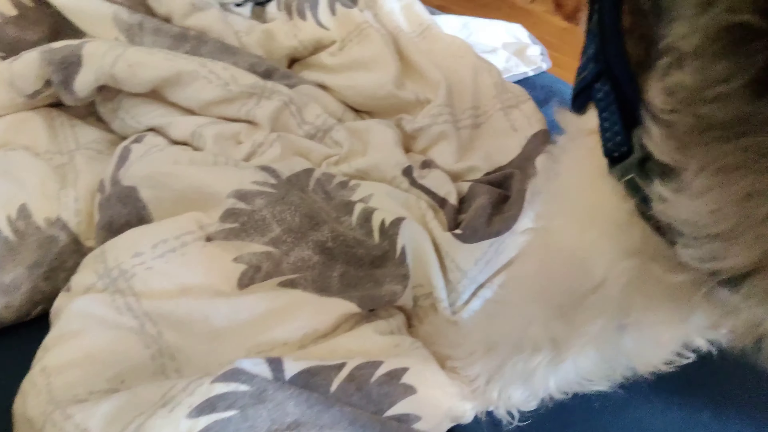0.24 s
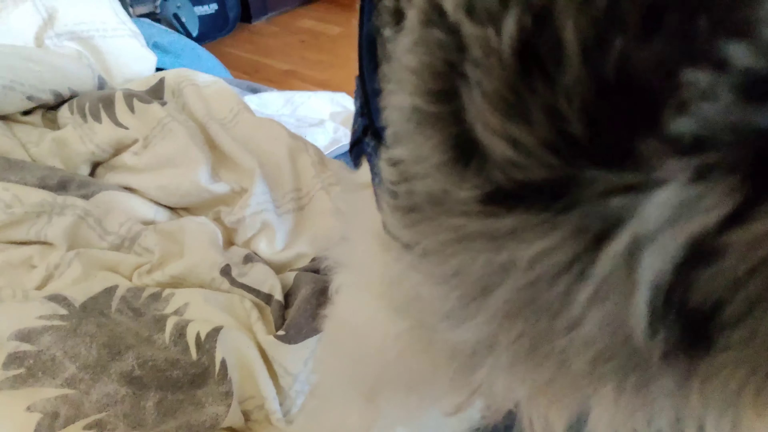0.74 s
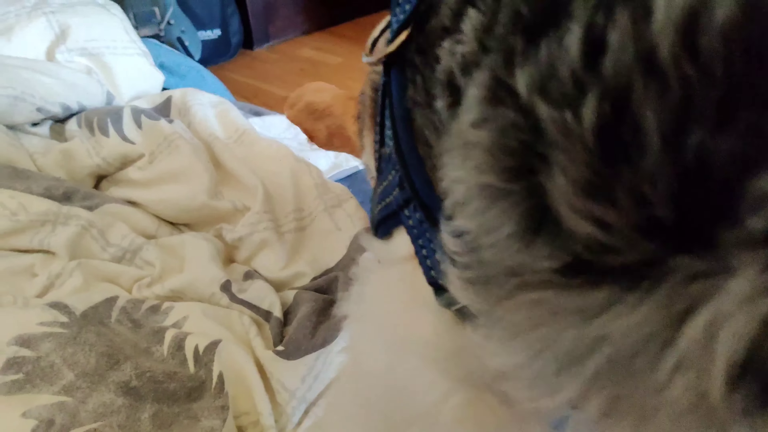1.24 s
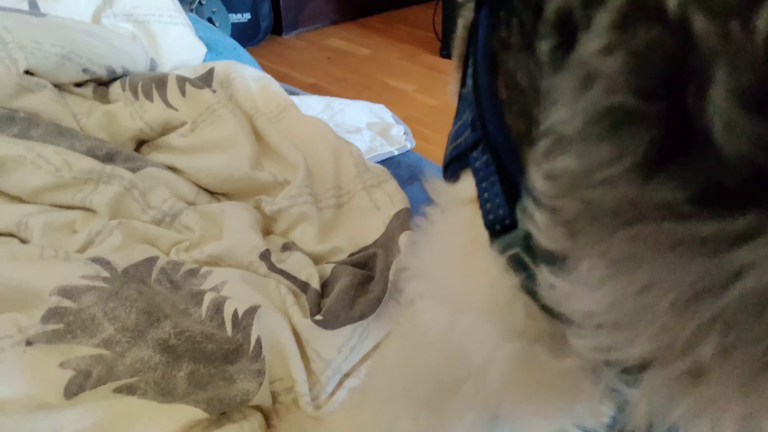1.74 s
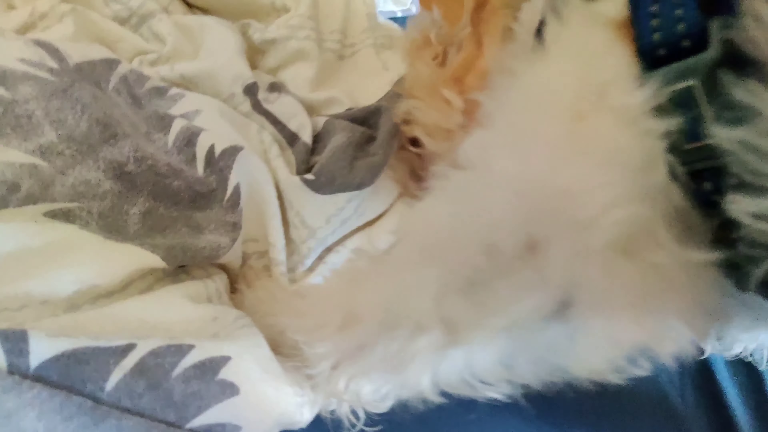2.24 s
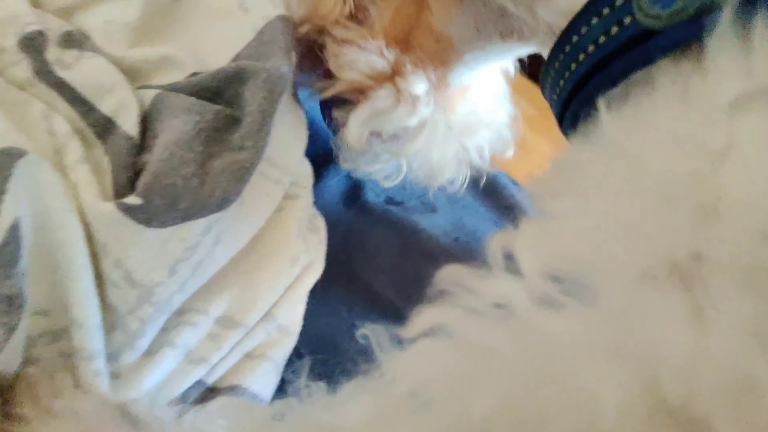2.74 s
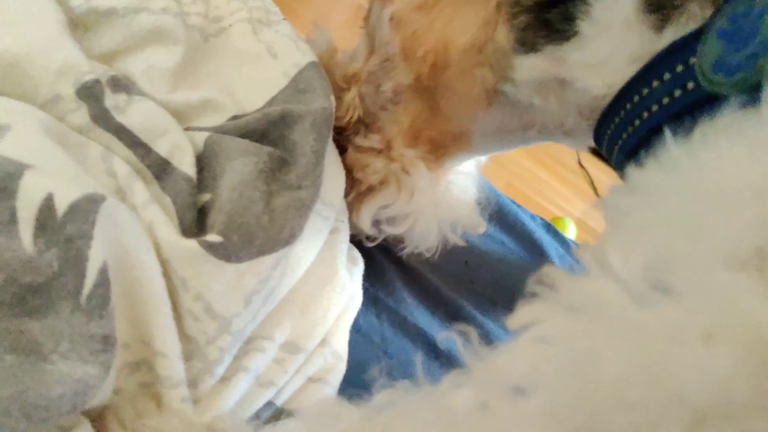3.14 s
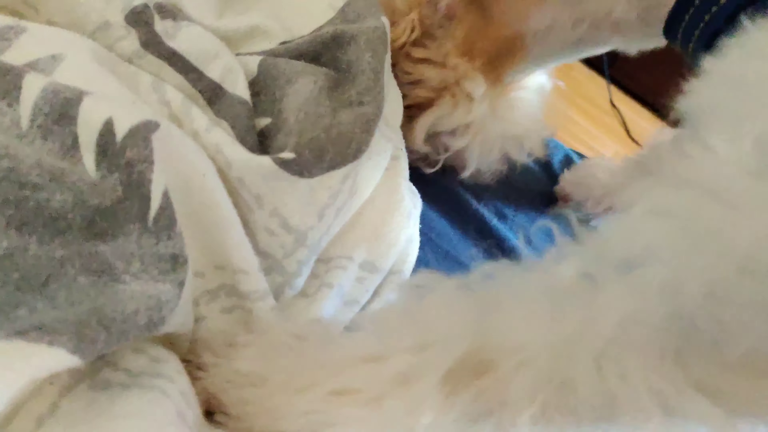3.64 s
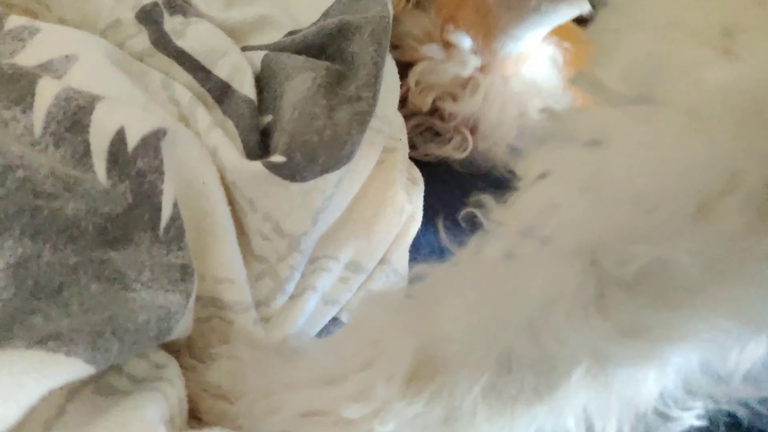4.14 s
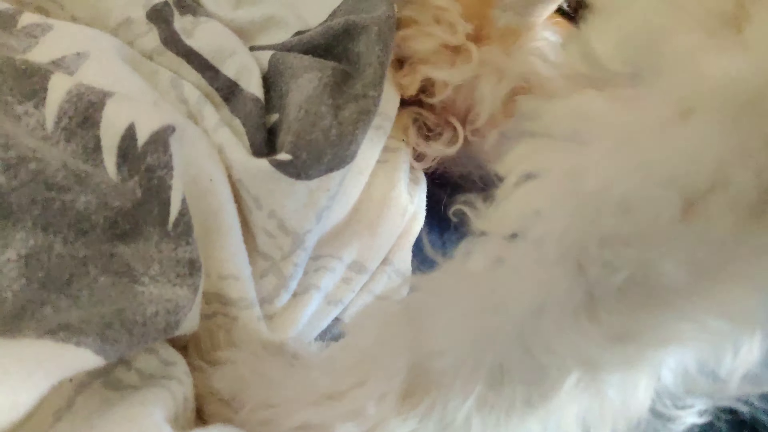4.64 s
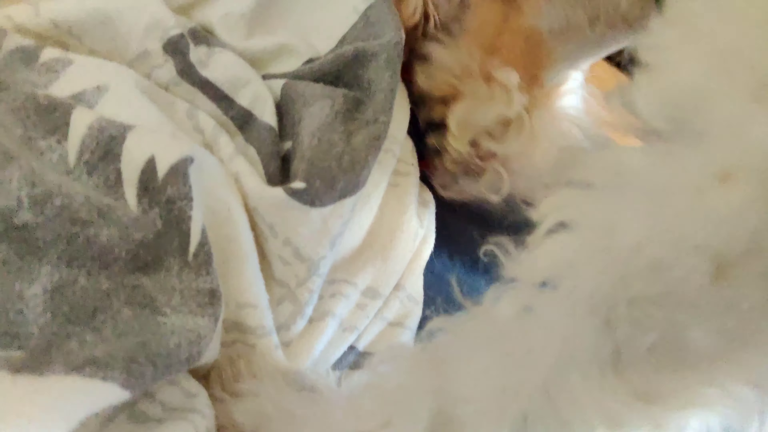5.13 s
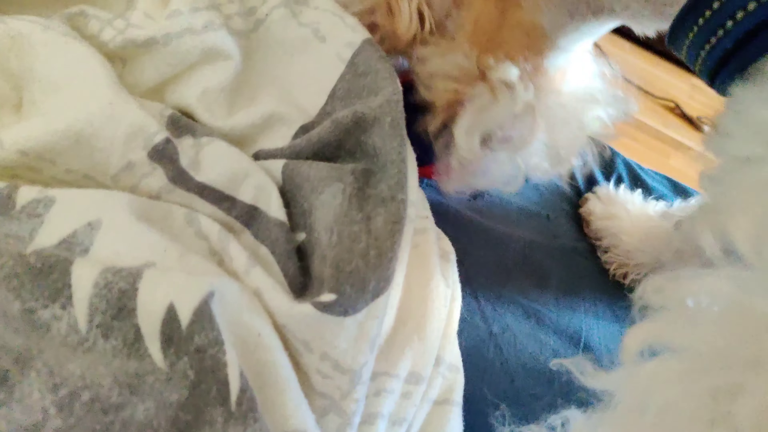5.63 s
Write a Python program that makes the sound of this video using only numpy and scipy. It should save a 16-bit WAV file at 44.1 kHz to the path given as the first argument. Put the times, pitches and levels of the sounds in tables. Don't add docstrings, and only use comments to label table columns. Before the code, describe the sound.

A rubber squeaker shrieks under a dog's bites, each squeal swooping up and falling, some breaking into low raspy notes, with thin whistles as air returns. Bedding heaves and rustles underneath, with dull paw thumps. The squeals pause after four seconds for faint ticks, then return twice at the end. Near handheld microphone, hard-walled small room, light hiss.

```python
import sys
import numpy as np
from scipy import signal
from scipy.fft import rfft, irfft
from scipy.io import wavfile
from scipy.ndimage import uniform_filter1d, minimum_filter1d

SR = 44100
rng = np.random.default_rng(int(sys.argv[2]) if len(sys.argv) > 2 else 0)


def pcm_store(signal):
    levels = np.round(np.clip(np.atleast_2d(signal), -1, 1) * 32767)
    wavfile.write(sys.argv[1], SR, levels.astype(np.int16).T)


def gain_from_decibels(decibels):
    exponent = np.asarray(decibels, float) / 20
    return 10 ** exponent


N = 259308
LEAD = SR // 4

# [f/Hz, level/dB per Hz]
HISS_SPECTRUM = [(120, -30), (200, -5.5), (538, -10.5), (986, -16), (1370, -22), (7830, -24), (9230, -23),
                 (16000, -30)]
# [f/Hz, level/dB]
PORT_DIFFERENCE = [(100, -3.5), (2000, 3), (5000, -1.5), (7000, 4.5), (9000, 15), (12000, 6), (16000, 9.5)]
# [f/Hz, level/dB per Hz]
HEAVE_SPECTRUM = [(12, -16.5), (25, -1), (45, -3), (80, -10.5), (180, -14.5), (300, -43.5), (500, -100)]
# [t/s, rumble level/dB, rustle level/dB]
WEIGHT_SHIFTS = [(0.0, -54, -68), (0.309, -46, -73), (.47, -56, -60), (0.598, -57.5, -63.5),
                 (0.832, -45, -57.5), (1.002, -54, -87), (1.391, -40, -59), (1.56, -52, -49),
                 (1.69, -53, -60), (1.85, -56.5, -68), (2.13, -38, -58), (2.36, -49, -56.5),
                 (2.5, -42, -60.5), (2.63, -58, -57), (2.78, -49.5, -47.5), (2.989, -49.5, -70),
                 (3.13, -46, -76), (3.239, -49.5, -61), (3.491, -61, -54.5), (3.669, -37.5, -53.5),
                 (3.95, -55, -52.5), (4.11, -43, -54), (4.28, -32, -82), (4.88, -48, -93), (5.1, -66, -72),
                 (5.31, -49.5, -90), (5.44, -43.5, -66.5), (5.679, -43, -50)]
# [t/s, peak level/dB]
QUILT_THUMPS = [(.095, -43), (.223, -44.5), (.27, -36), (.835, -35.5), (1.289, -53), (1.318, -30),
                (1.365, -36.5), (1.634, -36.5), (1.857, -30.5), (2.049, -33), (2.114, -24), (2.143, -53),
                (2.407, -29.5), (2.474, -34), (2.753, -34), (3.014, -43.5), (3.106, -33), (3.445, -26.5),
                (3.662, -56.5), (4.093, -36), (4.243, -32.5), (4.271, -31.5), (4.538, -53), (4.888, -48),
                (5.271, -44), (5.325, -43), (5.371, -43), (5.395, -48.5), (5.423, -37)]
# [t/s, peak level/dB, ring f/Hz]
TEETH_TICKS = [(.183, -45.5, 8470), (1.2698, -48.5, 5820), (4.6144, -61, 5460), (4.7214, -46.5, 5450),
               (4.7272, -40.5, 5400), (4.7765, -49, 5800), (4.7951, -52, 2240), (4.8414, -61, 5950),
               (5.0818, -40.5, 2450), (5.3291, -53, 5230)]
# [delay t/s, left level/dB, right level/dB]
FIRST_ECHOES = [
    (.0003, -20, -29.5),
    (.0008, -31.5, -16.5),
    (.0021, -31.5, -12.5),
    (.0047, -17, -23.5),
    (.0093, -37, -10.5),
]
# [f/Hz, level/dB]
SHELL_COLOUR = [(900, -13), (1400, -13.5), (2600, -2.5), (3750, -8), (5600, 2.5), (7200, -13), (9400, -5.5),
                (11000, -15.5), (15000, -16.5), (16200, -36.5)]
# [pitch f/Hz, level/dB]
OVERTONE_LEVELS = [(1200, -14.5), (2000, -8), (3000, -12.5), (4000, -14.5), (5000, -22.5), (6200, -34),
                   (7000, -28.5), (7900, -21.5)]
# [t/s, pitch f/Hz, fundamental level/dB]
OPENING_BITES = [
    [(-.2, 2500, -20), (-.12, 3974, -24), (-.06, 3983, -36), (-.02, 1410, -35)],
    [(.388, 2900, -29.5), (.406, 3750, -21.5), (.425, 4955, -7.5), (.479, 6204, -7.5), (.488, 5909, -8.5),
     (.516, 3820, -20), (.531, 2090, -36), (.54, 1411, -29), (.546, 1337, -41)],
    [(.59, 1418, -27), (.6, 2933, -25), (.608, 2930, -32)],
    [(.818, 2900, -30), (.826, 4598, -15.5), (.834, 5080, -6.5), (.852, 4260, -13.5), (.871, 2830, -24),
     (.897, 1332, -28.5), (.905, 1258, -36)],
    [(1.402, 2623, -29), (1.438, 3130, -18.5), (1.455, 3204, -12.5), (1.466, 3630, -19), (1.484, 4098, -24),
     (1.507, 3450, -22), (1.527, 3029, -22), (1.57, 2952, -32.5)],
    [(1.582, 1468, -24.5), (1.592, 2990, -18.5), (1.604, 3644, -19.5), (1.617, 3900, -28.5),
     (1.636, 3587, -16), (1.679, 5200, -9), (1.696, 4430, -14), (1.73, 1950, -30), (1.75, 1292, -31.5)],
]
# [t/s, pitch f/Hz, fundamental level/dB]
MIDDLE_BITES = [
    [(2.269, 1330, -25.5), (2.282, 1558, -21.5), (2.302, 1500, -26.5), (2.335, 1260, -33)],
    [(2.526, 2700, -21.5), (2.538, 2945, -21), (2.542, 1923, -25.5), (2.552, 3237, -25), (2.566, 3825, -18),
     (2.585, 6030, -9), (2.605, 6960, -19.5), (2.63, 5230, -11.5), (2.68, 1373, -36.5)],
    [(2.758, 1215, -32.5), (2.767, 1557, -22), (2.825, 1280, -24.5), (2.845, 1289, -34)],
    [(2.85, 2790, -35.5), (2.887, 2568, -32.5), (2.905, 2850, -34.5), (2.92, 2167, -28),
     (2.93, 2540, -42.5)],
    [(3.228, 1739, -32.5), (3.242, 1853, -30), (3.252, 1766, -31), (3.27, 1958, -31), (3.291, 3200, -26.5),
     (3.304, 3194, -19.5), (3.334, 3300, -23.5), (3.35, 1565, -35), (3.365, 1338, -43.5)],
    [(3.446, 1600, -28), (3.458, 1900, -23), (3.48, 2305, -19.5), (3.492, 2700, -21), (3.499, 3130, -28),
     (3.548, 3330, -21), (3.571, 4123, -8), (3.588, 3310, -23), (3.597, 2197, -16)],
]
# [t/s, pitch f/Hz, fundamental level/dB]
CLOSING_BITES = [
    [(3.692, 2850, -16), (3.706, 3740, -12.5), (3.729, 5893, -7), (3.75, 7070, -15), (3.772, 7620, -19.5),
     (3.79, 7070, -9.5), (3.811, 4994, -8.5), (3.832, 3200, -27.5), (3.855, 1450, -30.5)],
    [(3.918, 1165, -33), (3.929, 1532, -23.5), (3.969, 1680, -15.5), (4.0, 2064, -19), (4.016, 3110, -22),
     (4.08, 3290, -20), (4.095, 4170, -10), (4.138, 1310, -29), (4.15, 1351, -33.5)],
    [(5.461, 2877, -33), (5.476, 2880, -26), (5.483, 2330, -29.5), (5.493, 3200, -32.5), (5.508, 3250, -28),
     (5.534, 2350, -31), (5.553, 2254, -28), (5.575, 1468, -35)],
    [(5.63, 2493, -21), (5.636, 2323, -31), (5.666, 4727, -10), (5.68, 4593, -9), (5.684, 4408, -8),
     (5.707, 4298, -17), (5.748, 1630, -29), (5.76, 1305, -31)],
]
# [overtone start level/dB, end level/dB, left minus right level/dB, rasp/0-1, half beats/0-1]
JAW_GRIPS = [(-4.5, -7.5, 10, 0.1, 0.12), (3, -0.5, 5.5, .55, 0), (-0.5, 2, 2.5, .2, 0),
             (-2.5, -2, 2.5, 0.1, 0.04), (3, -6.5, 5.5, 0.4, 0), (-5.5, -7.5, 3.5, 0.7, 0),
             (3, 2, 5.5, .05, 0.05), (3.5, 0.5, 3.5, .4, 0), (3.5, 3, 5.5, 0.1, 0),
             (-19.5, -10, 3.5, .1, 0.02), (7, 6, 2, .15, 0.6), (4, -3, 3.5, .25, 0), (0.5, 2.5, 3.5, .3, 0),
             (-3, -4, 2, .2, 0), (4, 3, 1.5, .3, 0), (-1.5, -2, 4, 0.5, 0.02)]
# [t/s, length t/s, pitch f/Hz, peak level/dB, place of peak/0-1]
REFILL_WHISTLES = [
    (.68, 0.14, 2938, -36.5, .7),
    (1.376, 0.027, 3440, -46, .95),
    (2.14, .126, 3060, -27, .4),
    (3.597, .04, 2440, -28, .2),
    (5.434, 0.027, 3080, -47, .95),
    (5.799, 0.029, 4430, -29.5, .3),
]


def colour(hz, points):
    at, db = np.transpose(points)
    return np.interp(np.log(np.maximum(hz, 1)), np.log(at), db)


def shaped(x, points):
    gain = gain_from_decibels(colour(np.fft.rfftfreq(len(x), 1 / SR), points))
    return irfft(rfft(x) * gain, len(x))


def band(x, lo_hz, hi_hz):
    sos = signal.butter(2, [lo_hz, min(hi_hz, .45 * SR)], "band", fs=SR, output="sos")
    return signal.sosfilt(sos, x)


def unit(x):
    return x / np.sqrt(np.mean(x ** 2))


def walk(rate, size):
    hold = int(SR / rate)
    steps = np.repeat(rng.standard_normal(size // hold + 1), hold)
    return 1.3 * uniform_filter1d(uniform_filter1d(steps, hold), hold)[:size]


def swells(s, peak_db, rise_db_s, fall_db_s, rest_db):
    after = np.arange(N) / SR - s[:, None]
    db = peak_db[:, None] + np.where(after < 0, rise_db_s, -fall_db_s) * after
    return 10 * np.log10(np.sum(gain_from_decibels(db) ** 2, axis=0) + gain_from_decibels(rest_db) ** 2)


def hiss():
    noise = [unit(shaped(rng.standard_normal(N), HISS_SPECTRUM)) for _ in range(2)]
    return gain_from_decibels(-68.5 + 2.0) * np.array(noise)


def walls(x):
    t60_s, treble_share, tail_db = 0.4, 0.8, -6.5
    t = np.arange(int(.6 * SR)) / SR
    noise = rng.standard_normal((3, len(t)))
    noise = noise[:2] + .3 * noise[2]
    treble = band(noise, 2900, 14000)
    tail = (noise - treble) * gain_from_decibels(-60 * t / t60_s) + treble * gain_from_decibels(-60 * t / (t60_s * treble_share))
    tail = tail * (1 - np.exp(-(t / 0.0068) ** 2))
    tail = gain_from_decibels(tail_db) * tail / np.sqrt(np.sum(tail ** 2, axis=1, keepdims=True))
    for delay, *db in FIRST_ECHOES:
        tail[:, int(delay * SR)] += gain_from_decibels(np.array(db))
    return signal.fftconvolve(x[None], tail, axes=1)[:, :len(x)]


def heave(rumble_db):
    noise = rng.standard_normal(N) + 0.24 * rng.standard_normal((2, N))
    rumble = unit(np.array([shaped(v, HEAVE_SPECTRUM) for v in noise]))
    return rumble * gain_from_decibels(rumble_db + 0.83 * walk(27, N))


def rustle(rustle_db):
    grains = rng.standard_normal((2, N)) * gain_from_decibels(4.0 * walk(60, N))
    cloth = grains[0] + .35 * grains[1] * np.array([[1], [-1]])
    return unit(band(band(cloth, 110, 1600), 110, 1600)) * gain_from_decibels(rustle_db + 4.0)


def bedding():
    s, rumble_db, rustle_db = np.transpose(WEIGHT_SHIFTS)
    out = heave(swells(s, rumble_db, rise_db_s=200, fall_db_s=150, rest_db=-67))
    out += rustle(swells(s, rustle_db, rise_db_s=198.5, fall_db_s=94, rest_db=-86))
    t = np.arange(int(.12 * SR)) / SR
    decay = np.exp(-t / 0.011) + 0.079 * np.exp(-t / 0.024)
    for at, db in QUILT_THUMPS:
        knock = band(rng.standard_normal(len(t)) * decay, 49, 511.7)
        start = int(at * SR)
        out[:, start:start + len(t)] += gain_from_decibels(db - 5.5) * knock / np.abs(knock).max()
    return out


def ticks():
    width_hz = 2400
    out = np.zeros(N)
    t = np.arange(int(.1 * SR)) / SR
    decay = np.exp(-t / 0.00085) + 0.027 * np.exp(-t / 0.011)
    for at, db, hz in TEETH_TICKS:
        noise = rng.standard_normal(len(t))
        click = band(noise * decay, max(hz - width_hz / 2, 400), hz + width_hz / 2)
        start = int(at * SR)
        out[start:start + len(t)] += gain_from_decibels(db) * click / np.abs(click).max()
    return out


def refill_tracks():
    tracks = []
    for s, length, hz, db, peak in REFILL_WHISTLES:
        top_s = s + np.clip(peak, .05, .95) * length
        tracks.append([(s, hz, db - 11.5), (top_s, hz, db), (s + length, 0.97 * hz, db - 11.5)])
    return tracks


def controls():
    tracks, flow = np.zeros((6, N + LEAD)), np.zeros(N + LEAD)
    squeaks = OPENING_BITES + MIDDLE_BITES + CLOSING_BITES + refill_tracks()
    grips = JAW_GRIPS + [(-25, -25, 7, .2, 0)] * len(REFILL_WHISTLES)
    for rows, (first_db, last_db, *grip) in zip(squeaks, grips):
        s, *columns = np.transpose(rows)
        at = np.arange(int(s[0] * SR), min(int(s[-1] * SR), N))
        glides = [np.interp(at / SR, s, c) for c in columns]
        tracks[:3, at + LEAD] = glides + [np.linspace(first_db, last_db, len(at))]
        tracks[3:, at + LEAD] = np.array(grip)[:, None]
        flow[at + LEAD] = 1
    on = np.flatnonzero(flow)
    bridged = [np.interp(np.arange(N + LEAD), on, c[on]) for c in tracks]
    hz, db, grip_db, pan_db, rasp, half = [uniform_filter1d(c, int(.004 * SR)) for c in bridged]
    over_db = grip_db + colour(hz, OVERTONE_LEVELS) - 0.49 * db
    clean_hz, raspy_hz, even_hz = 5200, 3200, 2900
    rasp = rasp * np.clip((clean_hz - hz) / (clean_hz - raspy_hz), 0, 1)
    half = half * np.clip((even_hz - hz) / 400, 0, 1)
    flow = minimum_filter1d(-minimum_filter1d(-flow, size=133), size=133)
    return hz, db, over_db, pan_db, rasp, half, uniform_filter1d(flow, int(0.0075 * SR))


def reed(hz, over_db, rasp, half):
    size = len(hz)
    hz = hz - 80 * np.minimum(hz / 4000, 1) * np.sin(2 * np.pi * hz / 650)
    hz = hz * (1 + (0.0023 + .035 * rasp) * walk(300, size) + .045 * rasp * walk(70, size))
    phase = 2 * np.pi * np.cumsum(hz) / SR
    k = np.arange(2, 10)[:, None]
    share = gain_from_decibels(colour(k * hz, SHELL_COLOUR) - 2.2 * np.log2(k))
    share = share / np.sum(share ** 2, axis=0) ** 0.36 * gain_from_decibels(2.0)
    share = share * (k * hz < .45 * SR)
    flutter = np.array([gain_from_decibels((-0.12 + 5.1 * rasp) * walk(220, size)) for _ in range(4)])
    flutter[:3] *= [gain_from_decibels((3.0 + 5 * rasp) * walk(45, size)) for _ in range(3)]
    partials = share * flutter[k[:, 0] % 3] * np.sin(k * phase + k ** 2)
    overtones = np.sum(partials, axis=0) * gain_from_decibels(over_db)
    skips = 1 + .7 * rasp * walk(1500, size) + half * np.cos(phase / 2)
    tone = np.sqrt(2) * (np.sin(phase) * flutter[3] + overtones) * skips
    air = unit(shaped(rng.standard_normal(size), SHELL_COLOUR)) * gain_from_decibels(1.9 * walk(90, size))
    return tone + air * gain_from_decibels(-8.0 + 14 * rasp + 0.99 * over_db)


def toy():
    hz, db, over_db, pan_db, rasp, half, flow = controls()
    sound = reed(hz, over_db, np.clip(rasp, 0, 1), half) * gain_from_decibels(db) * flow
    sound = band(band(sound, 930, 23000), 930, 23000)
    direct = sound * gain_from_decibels(np.array([pan_db, -pan_db]) / 2)
    return (direct + walls(sound))[:, LEAD:]


def scene():
    clicks = ticks()
    left, right = toy() + clicks + gain_from_decibels(0.5) * walls(clicks)
    left = shaped(np.roll(left, 1), [(hz, -db / 2) for hz, db in PORT_DIFFERENCE])
    right = shaped(right, [(hz, db / 2) for hz, db in PORT_DIFFERENCE])
    return np.array([left, right]) + bedding() + hiss()


def band_limit(x):
    return signal.sosfilt(signal.butter(12, 16000, fs=SR, output="sos"), x)


def record(dry):
    held = dry / (1 + (np.abs(dry) / .86) ** 6) ** (1 / 6)
    return band_limit(held)


dry = scene()
out = record(dry)
pcm_store(out)
```